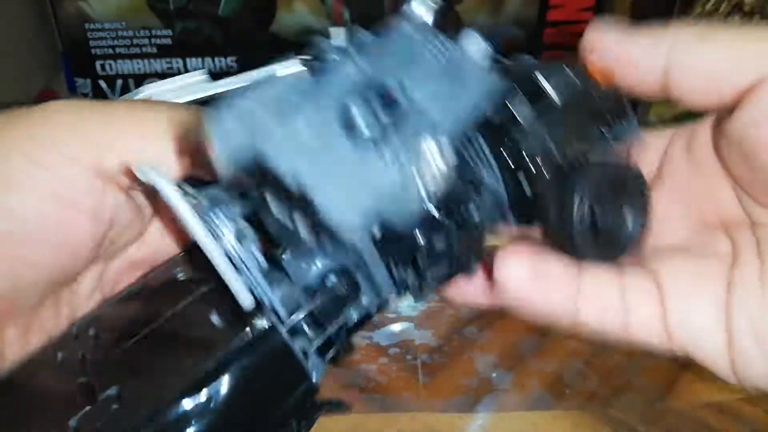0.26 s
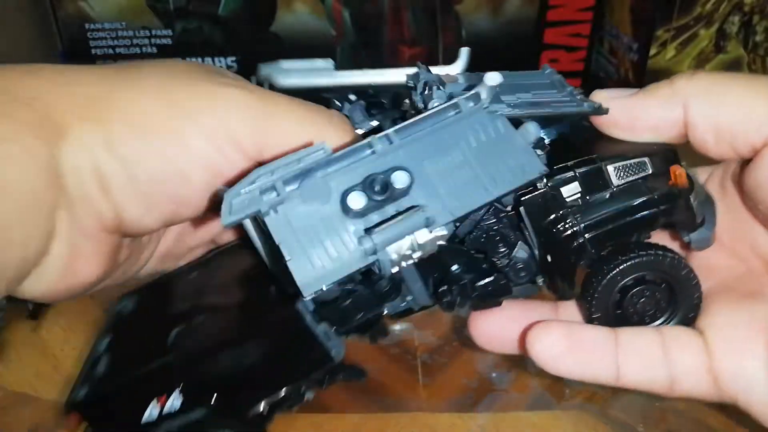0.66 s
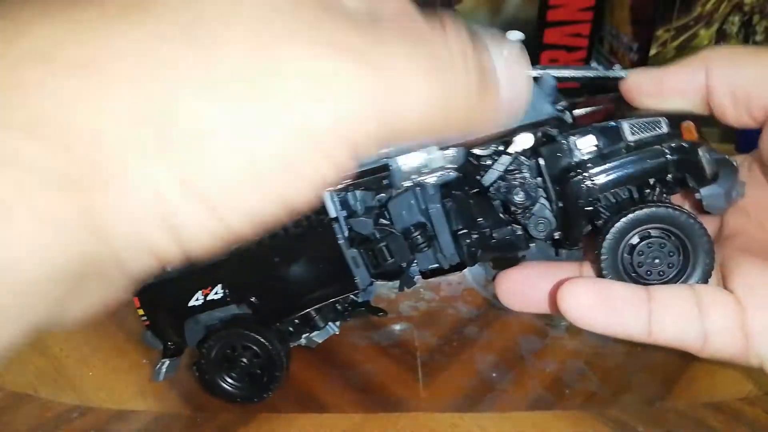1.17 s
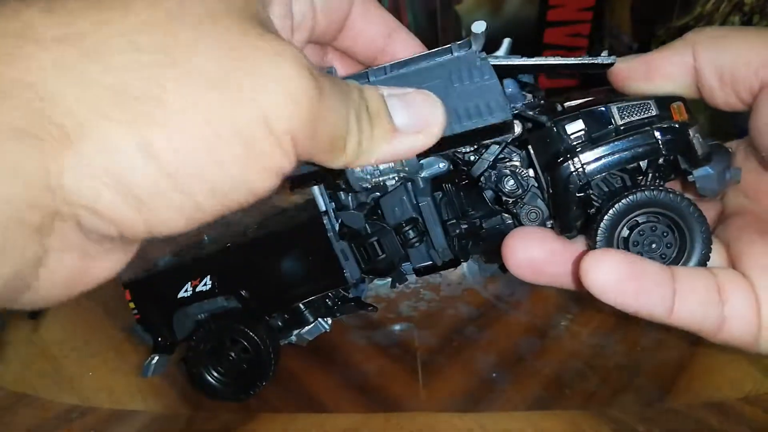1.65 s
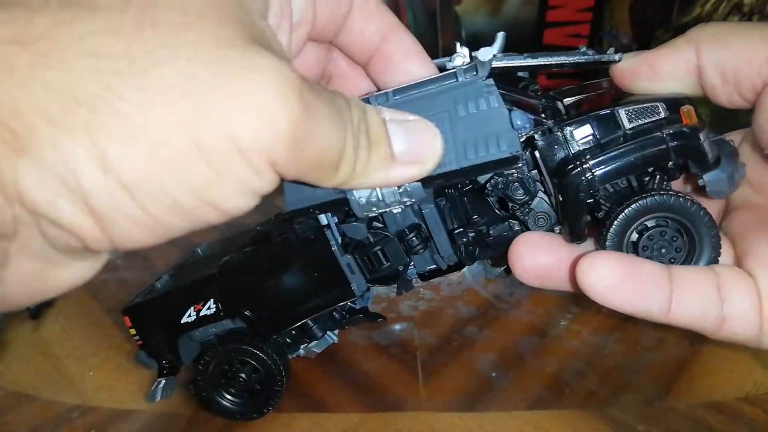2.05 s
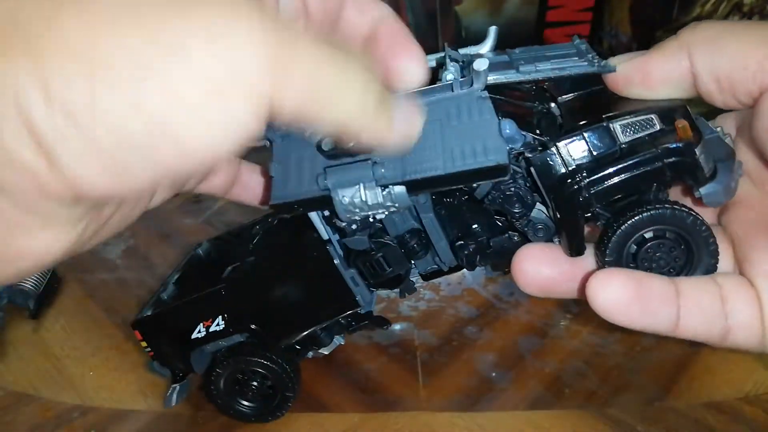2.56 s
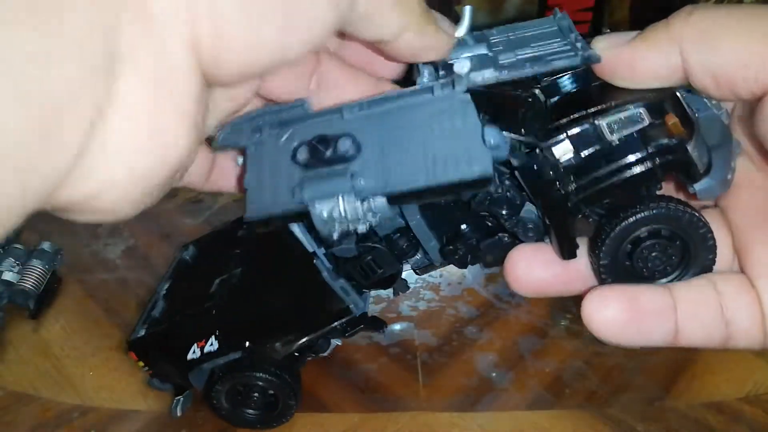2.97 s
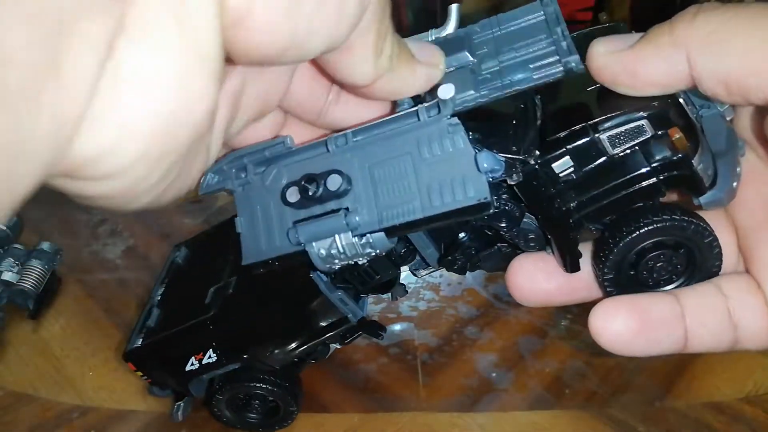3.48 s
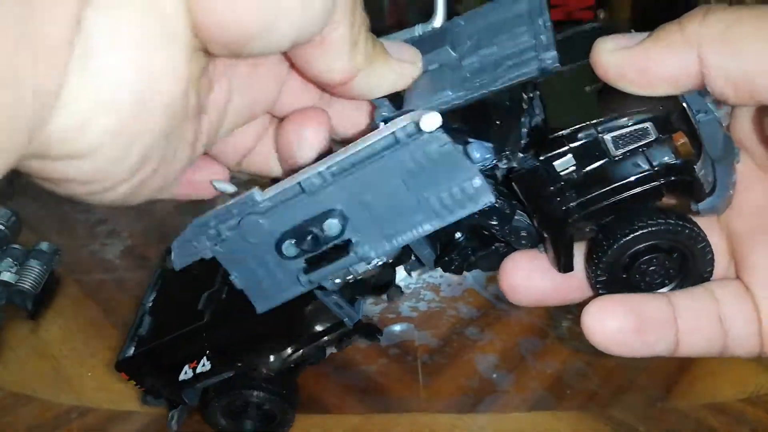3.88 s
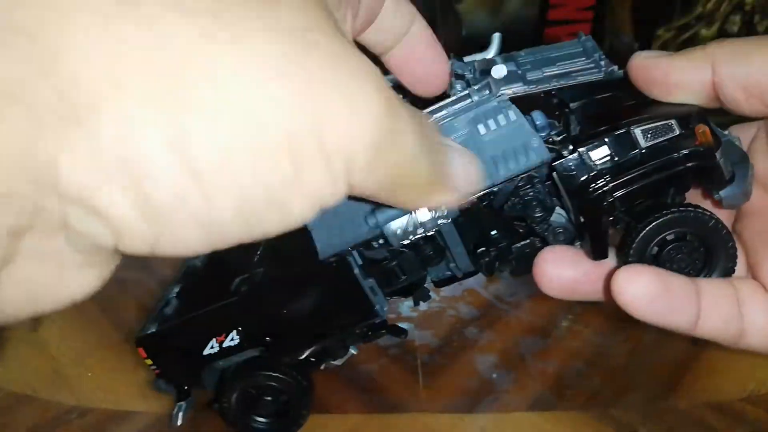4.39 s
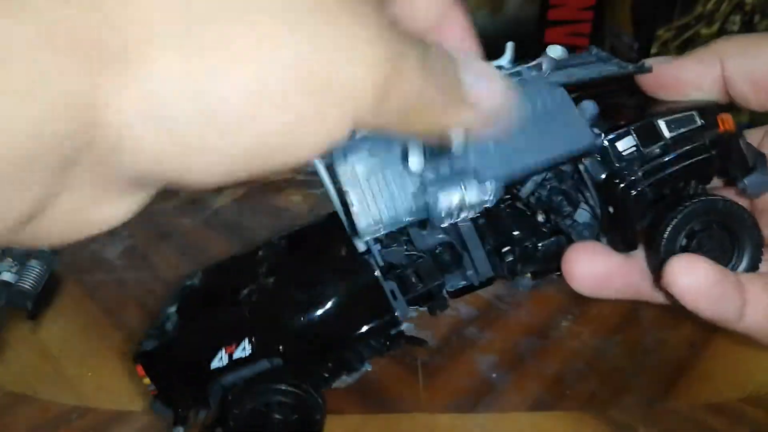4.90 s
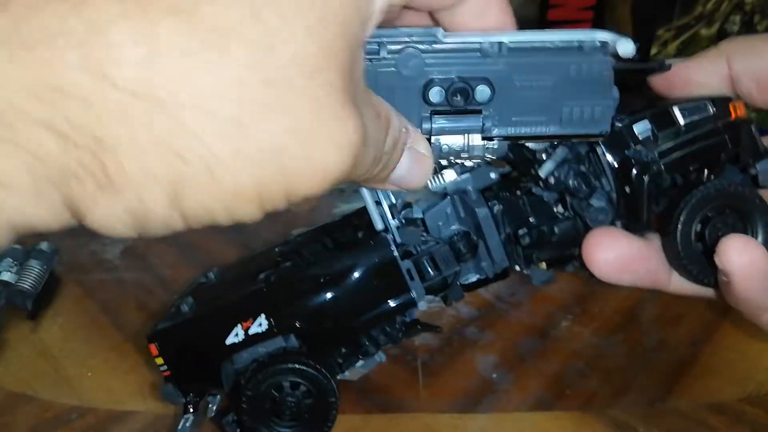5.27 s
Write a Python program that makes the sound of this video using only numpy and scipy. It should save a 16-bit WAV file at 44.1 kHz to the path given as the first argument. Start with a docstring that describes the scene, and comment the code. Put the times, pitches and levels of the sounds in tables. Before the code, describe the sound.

A hard plastic toy is folded by hand, heard very close in a small quiet room. It opens with a soft finger rub, then light clicks at 0.3 and a crisp one near 0.5 seconds. At 0.7 a loud double clack lands with a hard wooden knock and short low boom. A faint thin squeak follows at 0.8, then two sharp snaps around 1.35 and a small cluster at 1.8. It is mostly quiet until a dull bump at 2.5, with a faint rub and creak after it. Clicks return at 3.0 and 3.2, then grow frequent from 3.6, with bright snaps near 3.8, 3.95 and 4.3, and a hollow bump at 4.2. More clatter and rubbing come at 4.45 to 4.8, a strong bright snap at 5.07, and small ticks to 5.45. Low hum, soft hiss and a barely audible steady tone continue underneath.

```python
"""Hard plastic toy folded on a table

Hands fold a plastic toy vehicle on a wooden table, close to a phone with two microphone ports.
Clicks are chattering contacts that excite damped shell modes; bumps sum table modes, booming near 200 Hz.
Slides and hinge squeaks are uneven noise grains through resonances; decaying noise gives the small
room's tail. Shaped noise makes the quiet hum and microphone hiss, with a faint steady tone."""
import sys
import numpy as np
from scipy import signal
from scipy.fft import rfft, irfft, next_fast_len
from scipy.io import wavfile
from scipy.ndimage import uniform_filter1d

SR = 44100
rng = np.random.default_rng(int(sys.argv[2]) if len(sys.argv) > 2 else 0)


def file_out(sig):
    """Save sig as 16-bit WAV at sys.argv[1]."""
    # one column per channel
    cols = np.atleast_2d(sig).T
    # limit, then scale
    lim = np.clip(cols, -1, 1)
    pcm = np.round(lim * 32767).astype(np.int16)
    wavfile.write(sys.argv[1], SR, pcm)


N = 244295  # length in samples


def undb(db):
    """Logarithmic level: decibels to amplitude gain."""
    return 10 ** (np.asarray(db) / 20)


def ring(hz, t60, t, phase):
    """Free decay: exponentially damped sines, one row a mode."""
    hz, t60, phase = (np.reshape(v, (-1, 1)) for v in (hz, t60, phase))
    decay = np.exp(-np.log(1000) * t / t60)
    return np.sin(2 * np.pi * hz * t + phase) * decay


def band(x, hz, width):
    """Simple resonance: a second-order peak with gain 1 at its centre."""
    b, a = signal.iirpeak(min(hz, .45 * SR), hz / width, fs=SR)
    return signal.lfilter(b, a, x)


def add(out, sound, s):
    """Superposition: mix a sound in at s seconds, cut to the scene."""
    i = int(s * SR)
    sound = sound[..., max(-i, 0):N - i]
    out[..., max(i, 0):max(i, 0) + sound.shape[-1]] += sound


# Background spectrum: freq_hz [Hz], relative density_db [dB per Hz]
HUSH_SPECTRUM = [(15, -44), (28, 2.5), (45, -4), (63, 3.5), (85, -4), (135, -3.5), (195, -1), (260, -9.5),
                 (380, -11.5), (560, -17.5), (1220, -10), (2200, -15.5), (9500, -18.5), (15200, -28.5),
                 (16500, -46)]
# Correlation of the background at the two ports: freq_hz [Hz], left_right_correlation [-1 to 1]
PORT_LIKENESS = [(30, 0.94), (130, 0.97), (290, 0.71), (640, -0.63), (1300, 0.18), (16000, -0.092)]
# Faint steady tone: freq_hz [Hz], level_db [dB RMS]
WHINE_TONE = (2405, -80.5)
HUSH_DB = -63  # RMS of the part common to both ports


def hush():
    """Partial coherence: room hum is alike at both ports in the bass, microphone hiss nearly unrelated."""
    size = next_fast_len(N)
    log_hz = np.log(np.maximum(np.arange(size // 2 + 1) * SR / size, 1))
    spectrum_hz, density_db = np.transpose(HUSH_SPECTRUM)
    gain = undb(np.interp(log_hz, np.log(spectrum_hz), density_db))
    like_hz, correlation = np.transpose(PORT_LIKENESS)
    like = np.clip(np.interp(log_hz, np.log(like_hz), correlation), -1, 1)

    def noise(shape):
        return irfft(rfft(rng.standard_normal(size)) * shape, size)[:N]

    mid = noise(gain)
    side = noise(gain * np.sqrt((1 - like) / (1 + like)))  # this power ratio sets the correlation
    scale = undb(HUSH_DB) / np.sqrt(np.mean(mid ** 2))
    tone_hz, tone_db = WHINE_TONE
    tone = undb(tone_db) * np.sqrt(2) * np.sin(2 * np.pi * tone_hz * np.arange(N) / SR)
    return scale * np.array([mid + side, mid - side]) + tone


# Panel resonances under a finger: freq_hz [Hz], width_hz [Hz], level_db [dB, before PANEL_DB]
PANEL_MODES = [(1190, 300, 1), (2300, 430, 7), (3200, 760, 3), (4580, 700, -3), (6450, 800, -14.5),
               (9000, 3800, -4)]
PANEL_DB = 4  # added to every panel resonance
TOUCH_IN, TOUCH_OUT = 0.12, 0.48  # fractions of a slide that swell and fade
GRIP_DB = 19  # unevenness of the grip, before smoothing


def rub(ms, hz, width_hz, db, glide_hz=0, panel=False):
    """Stick-slip friction: dense uneven grains drive a resonance, which may glide or ring the panel."""
    grains = rng.standard_normal((4, 24000))[:, :int(ms * SR / 1000)]
    grip = undb(GRIP_DB * uniform_filter1d(grains[3], size=80))
    force = (grains[:2] + grains[2]) * grip  # own grains at each port, plus shared ones
    sound = band(band(force, hz, width_hz), hz, width_hz)
    if panel:
        sound = sound + sum(undb(PANEL_DB + g) * band(sound, f, w) for f, w, g in PANEL_MODES)
    t = np.arange(sound.shape[1]) / SR
    shift = np.exp(1j * np.pi * glide_hz * t ** 2 / t[-1])  # frequency shift growing from 0 to glide_hz
    sound = np.real(signal.hilbert(sound) * shift)
    touch = np.clip(np.minimum(t / TOUCH_IN, (t[-1] - t) / TOUCH_OUT) / t[-1], 0, 1)
    return sound / np.sqrt(np.mean(sound ** 2)) * undb(db) * touch


# Finger slides: start_s [s], length_ms [ms], centre_hz [Hz], level_db [dB RMS before the touch],
# scrape_db [dB RMS before the touch, toy on table]
FINGER_SLIDES = [(-0.06, 180, 2920, -56.5, -59.5), (-0.02, 270, 9000, -68.5, -73.5),
                 (0.412, 150, 5000, -60, -83), (0.487, 320, 8400, -69, -101), (0.85, 60, 8300, -62.5, -79),
                 (0.995, 70, 4000, -58, -75), (1.689, 63, 9400, -71.5, -90),
                 (2.55, 550, 2300, -74.5, -64.5), (3.62, 31, 4900, -55, -66), (4.495, 85, 9000, -57, -80),
                 (4.515, 70, 4600, -58.5, -75), (4.55, 230, 2680, -67.5, -66.5),
                 (4.65, 80, 8700, -67.5, -85), (4.69, 170, 4100, -61.5, -64), (4.922, 31, 9000, -64, -83),
                 (5.14, 36, 8200, -55, -69), (5.338, 41, 9050, -62.5, -85), (5.378, 90, 2340, -56.5, -72),
                 (5.428, 49, 7940, -61, -84)]
SLIDE_WIDTH_HZ, SCRAPE_HZ, SCRAPE_WIDTH_HZ = 5000, 333, 296  # widths are for each of two passes


def slides():
    """Sliding friction: fingers rub resonant panels while the toy scrapes the table."""
    out = np.zeros((2, N))
    for start_s, ms, hz, level_db, scrape_db in FINGER_SLIDES:
        finger = rub(ms, hz, SLIDE_WIDTH_HZ, level_db, panel=True)
        scrape = rub(ms, SCRAPE_HZ, SCRAPE_WIDTH_HZ, scrape_db)
        add(out, finger + scrape, start_s)
    return out


# Room tail by band: centre_hz [Hz], t60_s [s], tail_db [dB energy]
ROOM_BANDS = [(370, 0.23, -13.5), (770, 0.087, -16), (1560, 0.091, -17), (3120, 0.31, -16.5),
              (6100, 0.098, -13), (10400, 0.16, -16.5)]


def room(dry):
    """Diffuse reverberation: noise decays by band after the first reflections, with a tail for each port."""
    t = np.arange(16000) / SR
    tail = 0
    for hz, t60, db in ROOM_BANDS:
        noise = band(rng.standard_normal((2, len(t))), hz, hz * 1.88)
        noise = noise * np.exp(-np.log(1000) * t / t60) * (t > .004)
        tail = tail + undb(db) * noise / np.sqrt(np.sum(noise ** 2) / 2)
    return signal.fftconvolve(dry.mean(axis=0)[None], tail)[:, :N]


SNAP_DB = -4.5  # the first, clean snap against the chatter


def contact(t, ms):
    """Impulsive excitation: one snap, then spiky chatter that dies in a few ms, nearly even in spectrum."""
    fade = np.exp(-t / (max(ms, .1) / 1000)) * np.minimum(t / 0.00099, 1)
    spikes = rfft(rng.standard_normal(len(t)) ** 3 * fade)
    flattened = spikes / (np.abs(spikes) + 1e-9) ** .8
    chatter = irfft(flattened, len(t)) * np.sqrt(fade)
    snap = np.arange(len(t)) == int(.0008 * SR)
    return chatter / np.sqrt(np.sum(chatter ** 2)) + undb(SNAP_DB) * snap


def ports(hz, t60, weight_db, shade_db, t):
    """Diffraction: the phone body shades modes at two ports and turns their phase apart, more in the treble."""
    turn = rng.choice([-1, 1], len(hz)) * np.clip(.45 + hz / 9000, 0, .68)  # radians
    sign = (-1) ** np.arange(len(hz))  # neighbouring modes swing in opposite sense
    modes = [sign * undb(weight_db + k * shade_db / 2) @ ring(hz, t60, t, k * turn) for k in (1, -1)]
    return np.array(modes)


# Plastic clicks: start_s [s], peak_db [dB, RMS of the two ports], ring_hz [Hz, centre of the lifted modes],
# bright_db [dB, treble minus low], pan_db [dB, left minus right at 7 kHz before a general tilt]
PLASTIC_CLICKS = [(0.294, -38.5, 2936, -5, 10), (0.2998, -33.5, 3400, 24, 2), (0.4376, -35.5, 7700, 14, 0),
                  (0.4454, -47, 10700, 19, 0), (0.4795, -42, 5860, 8, 2), (0.4825, -26, 6300, 25, 1),
                  (0.6989, -20, 4450, 2, -8), (0.711, -22, 7440, 16, 10), (0.9047, -42.5, 9060, 31, 6),
                  (0.9757, -45.5, 3300, 17, 3), (1.0117, -40, 8700, 16, 1), (1.031, -36.5, 2440, 2, -1),
                  (1.3418, -24, 3370, 4.5, -4), (1.36, -21.5, 10300, 7, 2.5), (1.4003, -28.5, 3280, 6, -1),
                  (1.558, -46, 3140, 2, 4), (1.706, -42, 2900, 16, 0), (1.81, -33, 9100, 22, 13),
                  (1.8228, -30, 9700, 8, -11), (1.829, -30, 10400, 26, 5), (2.4424, -39, 4440, 36, 2),
                  (2.5272, -41, 1260, -2, 5), (2.6542, -30, 10630, 12, 3), (2.8667, -36.5, 3640, 15, 4),
                  (2.9307, -49, 7670, 6, 4), (2.971, -28.5, 1104, -10.5, 2), (3.2287, -26.5, 1650, -6, -13),
                  (3.232, -19.5, 7220, 36, 1.5), (3.4464, -40, 10000, 20, -2), (3.4675, -34, 10000, 4, 5.5),
                  (3.549, -49, 6000, 5, -2), (3.6062, -48, 9820, 6, 0), (3.618, -37.5, 1020, -11, 12),
                  (3.624, -32.5, 1220, 7, 0), (3.6414, -34.5, 4700, 7, 2), (3.6488, -41, 2730, 1, 3),
                  (3.7378, -45, 4170, 5, 0), (3.7656, -21.5, 3800, 42, -2), (3.788, -33.5, 4800, 13, 2.5),
                  (3.872, -32, 2600, 3, -1), (3.9603, -32.5, 6840, 5, 10), (3.9627, -17, 9900, 35, 6.5),
                  (4.131, -44.5, 3700, 28, 15), (4.1832, -41.5, 2860, 4, 6), (4.1996, -33, 1400, -19, 7),
                  (4.2664, -44, 9400, 30, -10), (4.289, -23.5, 8900, 14, 0.5),
                  (4.3128, -16.5, 4460, 15, -3), (4.3247, -23.5, 4250, 13, 9),
                  (4.4385, -24, 8170, 0.5, -1.5), (4.4437, -30, 9000, 3, -1), (4.546, -34, 8700, 18, 6),
                  (4.5642, -39, 2930, 8, -3), (4.6542, -40, 9400, 9, 2.5), (4.7106, -37.5, 4370, 6, -2),
                  (4.7582, -46, 4080, -2, -1.5), (4.779, -35.5, 4630, 19, 5), (4.9233, -47, 9970, 5, 10),
                  (4.9368, -37.5, 3000, 0, 4), (4.9488, -35.5, 3260, 4, -1), (4.964, -28, 2980, 7, -0.5),
                  (5.0595, -34, 9500, 30, -9), (5.0628, -29.5, 3570, 16, -4), (5.071, -18, 9300, 18, 11),
                  (5.0794, -27, 5000, 5, -9), (5.1355, -28.5, 5400, 25, -2.5), (5.156, -32, 3400, -7, 4),
                  (5.3528, -41, 7800, 19, -3), (5.38, -42.5, 3600, 15, 4), (5.443, -33.5, 11400, 23, -1),
                  (5.4481, -33, 5100, -1, -12)]
# Plastic shell modes when free: freq_hz [Hz], t60_s [s]
SHELL_MODES = [(1050, 0.011), (1300, 0.022), (1550, 0.0084), (1900, 0.02), (2250, 0.025), (2650, 0.02),
               (3050, 0.018), (3500, 0.021), (3900, 0.02), (4400, 0.014), (4950, 0.011), (5800, 0.0081),
               (6700, 0.007), (7700, 0.0064), (8500, 0.0036), (9250, 0.0046), (10200, 0.006),
               (11000, 0.0036), (12300, 0.0023), (13800, 0.0022)]
# Where a click's low, middle and treble weights apply: freq_hz [Hz]
BRIGHTNESS_HZ = (1300, 3800, 9500)
MIDDLE_SHARE = 0.64  # part of the brightness reached in the middle
CONTACT_MS, CONTACT_SCATTER = 2.7, .2  # median decay constant of the chatter, and its spread (log)
RING_DB, RING_WIDTH = 10, 0.16  # lift of the modes near ring_hz, and its width (log)
HELD_DAMP = .55  # a held toy rings shorter than its free modes
# Faint loose-part ticks at random: rate, mean level and its spread, median ring, brightness
TICKS_PER_S, TICK_DB, TICK_SCATTER_DB, TICK_HZ, TICK_BRIGHT_DB = 2.7, -49.5, 3.5, 5000, 13


def loose_ticks():
    """Poisson process: faint ticks of loose parts follow at exponentially spread gaps."""
    starts = np.cumsum(-np.log(rng.random(60))) / TICKS_PER_S
    ticks = []
    for start_s, (a, b, c) in zip(starts, rng.standard_normal((60, 3))):
        if start_s < N / SR:
            ring_hz = TICK_HZ * np.exp(0.54 * b)
            ticks.append((start_s, TICK_DB + TICK_SCATTER_DB * a, ring_hz, TICK_BRIGHT_DB, 4 * c))
    return ticks


def clicks():
    """Modal excitation: a chattering contact rings the heavily damped shell modes."""
    out, t = np.zeros((2, N)), np.arange(2048) / SR
    hz, t60 = np.transpose(SHELL_MODES)
    for start_s, peak_db, ring_hz, bright_db, pan_db in list(PLASTIC_CLICKS) + loose_ticks():
        chance = rng.standard_normal((3, len(hz)))
        brightness = [0, MIDDLE_SHARE * bright_db, bright_db]
        weight = np.interp(np.log(hz), np.log(BRIGHTNESS_HZ), brightness)
        weight = weight + RING_DB * np.exp(-(np.log(hz / ring_hz) / RING_WIDTH) ** 2)
        weight = weight + 1.18 * chance[0]
        held_hz = hz * (1 + 0.041 * chance[1])  # the grip detunes every part
        shade = pan_db * np.clip(hz / 7000, .2, 1.3) + 1.7 * np.log2(hz / 3000)
        ms = CONTACT_MS * np.exp(CONTACT_SCATTER * chance[2, 0])
        modes = ports(held_hz, HELD_DAMP * t60, weight, shade, t)
        pair = signal.fftconvolve(modes, contact(t, ms)[None])[:, :len(t)]
        peak = np.sqrt(np.mean(pair ** 2, axis=0)).max()
        add(out, pair * undb(peak_db) / peak, start_s)
    return out


# Table bumps: start_s [s], peak_db [dB, of the boom], deep_db [dB re boom peak, before the frame level],
# knock_db [dB, peak of the hard knock re boom peak]
TABLE_BUMPS = [(0.701, -19, -11, 9), (0.709, -26, -30, -31), (0.978, -50.5, -5, 6), (1.031, -47.5, -11, -7),
               (1.206, -50, -7, -11), (1.365, -39, -4.5, -20), (1.403, -52.5, -16, -13),
               (1.455, -51, -8, -27), (1.568, -54.5, -17, -4), (1.621, -54.5, -31, -19),
               (1.706, -49, -25, -1.5), (1.768, -55, -30, -19), (1.847, -52, -4, -9), (1.967, -57, -9, -12),
               (2.118, -58.5, -26, -9), (2.455, -52, -21, -25), (2.528, -27, -27, -14),
               (2.659, -46, -29, -2.5), (2.869, -42, -12, -6.5), (2.914, -52, -31, -17),
               (2.974, -47.5, -28, -4), (3.235, -50, -5.5, 0), (3.377, -59.5, -19, 3),
               (3.475, -46, -24, -8), (3.633, -37.5, -9.5, -1.5), (3.877, -54, -1, -12),
               (3.932, -41, -6, -6), (4.023, -51, -27, -26), (4.2, -24.5, -23.5, -2.5),
               (4.318, -45, -11.5, 7), (4.466, -33.5, -25, -11.5), (4.704, -52.5, -0.5, 5),
               (4.762, -50, -7, 3.5), (4.8, -51.5, -22, 1), (5.088, -54.5, 8, 14), (5.167, -50, -29, -1),
               (5.381, -56.5, -1, 9.5)]
# Table top modes: freq_hz [Hz], level_db [dB, relative], t60_s [s]
TOP_MODES = [(190.4, 9.5, 0.14), (209.4, 8.5, 0.15), (252, -18, 0.15), (299, 2, 0.083), (373, -2.5, 0.066),
             (365, -23, 0.26), (389.5, -24.5, 0.27)]
# Table frame mode: freq_hz [Hz], level_db [dB, added to deep_db], t60_s [s]
FRAME_MODES = [(111.1, 7, 0.19)]
# Stiff table modes: freq_hz [Hz], level_db [dB, relative], t60_s [s]
STIFF_MODES = [(524, -12, 0.036), (579, -2, 0.0098), (765, 1, 0.027), (959, -4, 0.027), (1060, -22, 0.067),
               (1280, 4, 0.021), (1607, 2, 0.022), (1874, -0.5, 0.033), (2062, -19.5, 0.064),
               (2580, -44, 0.023), (2900, -30, 0.014)]
PUSH_MS, PUSH_MS_PER_DB = -2.7, 0.8  # swell constant at 0 dB; weaker bumps push for longer
# The harder the knock, the brighter: tilt at 0 dB, tilt per dB of knock, upper limit
HARD_DB_PER_OCT, HARD_PER_KNOCK, HARDEST_DB_PER_OCT = -6, 0.84, -0.5


def table_boom(t, swell, detune):
    """Beating: a soft push swells table-top modes, of which a close pair beats."""
    hz, gain_db, t60 = np.transpose(TOP_MODES)
    # the upper modes depend on where the hands lean
    spot = (hz > 230) * rng.standard_normal((3, len(hz)))
    lead = 1.7 * (hz < 200) + 2 * spot[0]  # radians; the pair comes into step some 14 ms into the push
    mode_hz = hz * (1 + .05 * spot[2] + .006 * detune)
    boom = swell * (undb(gain_db + 3 * spot[1]) @ ring(mode_hz, t60, t, lead))
    return boom / np.abs(boom).max()


def frame_ring(t, swell, phase):
    """Low-frequency resonance: the same push swells the deep mode of the table frame."""
    hz, gain_db, t60 = np.transpose(FRAME_MODES)
    return swell * (undb(gain_db) @ ring(hz, t60, t, phase))


def table_knock(t, knock_db, chance):
    """Impact spectrum: a hard corner strikes stiff modes, with more treble for a harder blow."""
    hz, gain_db, t60 = np.transpose(STIFF_MODES)
    tilt_db = min(HARD_DB_PER_OCT + HARD_PER_KNOCK * knock_db, HARDEST_DB_PER_OCT)
    weight = gain_db + tilt_db * np.log2(hz / 1000) + 1.5 * chance[1]
    knock = ports(hz * (1 + 0.0095 * chance[0]), t60, weight, -6.0, t)
    knock = knock * np.minimum(t / 0.0028, 1)
    return knock / np.abs(knock).max()


def bumps():
    """Modal superposition: each bump sums boom and frame alike at both ports, and a knock shaded by port."""
    low, out, t = np.zeros(N), np.zeros((2, N)), np.arange(12000) / SR
    for start_s, peak_db, deep_db, knock_db in TABLE_BUMPS:
        ms = PUSH_MS - PUSH_MS_PER_DB * peak_db
        chance = rng.standard_normal((2, len(STIFF_MODES)))
        swell = 1 - np.exp(-t / (max(ms, .3) / 1000))
        boom = table_boom(t, swell, chance[0, 0])
        deep = frame_ring(t, swell, chance[0, 5:6])
        add(low, undb(peak_db) * (boom + undb(deep_db) * deep), start_s - .002)
        add(out, undb(peak_db + knock_db) * table_knock(t, knock_db, chance), start_s - .002)
    return low, out


# Hinge squeaks: start_s [s], length_ms [ms], start_hz [Hz], end_hz [Hz], level_db [dB RMS before the touch]
HINGE_SQUEAKS = [(0.825, 100, 6040, 6400, -65), (2.64, 280, 3000, 3290, -70), (4.92, 35, 10000, 9950, -63)]
SQUEAK_WIDTH_HZ = 380  # for each of two passes


def squeaks():
    """Frictional resonance: a hinge sticks and slips through a narrow band whose pitch glides."""
    out = np.zeros((2, N))
    for start_s, ms, start_hz, end_hz, level_db in HINGE_SQUEAKS:
        add(out, rub(ms, start_hz, SQUEAK_WIDTH_HZ, level_db, end_hz - start_hz), start_s)
    return out


# Microphone port: resonance_hz [Hz], width_hz [Hz], share_db [dB], rolloff_hz [Hz]
MIC_PORT = (9787, 3001, 2.5, 12500)


def scene():
    """Linear transmission: toy, table and fingers pass through the room and the resonant microphone ports."""
    boom, knock = bumps()
    no_bass = signal.butter(3, 750, "high", fs=SR, output="sos")  # small parts give no bass
    plastic = signal.sosfilt(no_bass, clicks())
    dry = plastic + knock + slides() + squeaks()
    air = dry + room(dry + 0.64 * boom)
    port_hz, width_hz, share_db, rolloff_hz = MIC_PORT
    air = air + undb(share_db) * band(air, port_hz, width_hz)
    port_band = signal.butter(3, [260, rolloff_hz], "band", fs=SR, output="sos")
    air = signal.sosfilt(port_band, air)
    return air + boom + hush()


TOP_HZ = 16500


def record(dry):
    """Band limitation: the phone steeply cuts everything above TOP_HZ."""
    return signal.sosfilt(signal.ellip(10, .2, 80, TOP_HZ, fs=SR, output="sos"), dry)


dry = scene()
out = record(dry)
file_out(out)
```